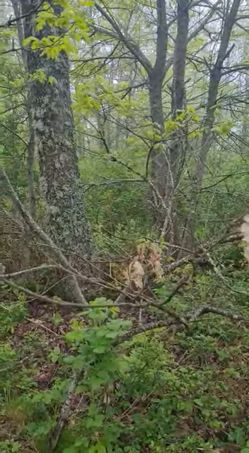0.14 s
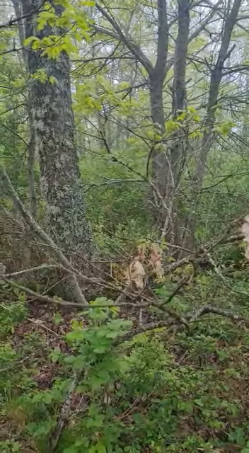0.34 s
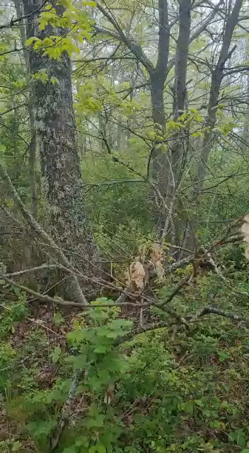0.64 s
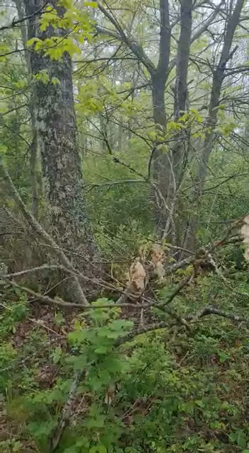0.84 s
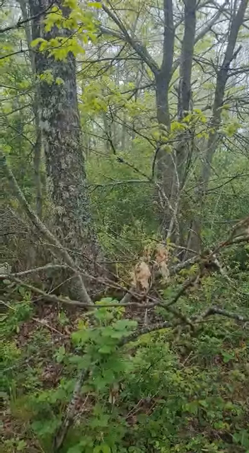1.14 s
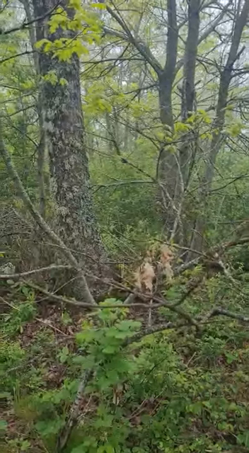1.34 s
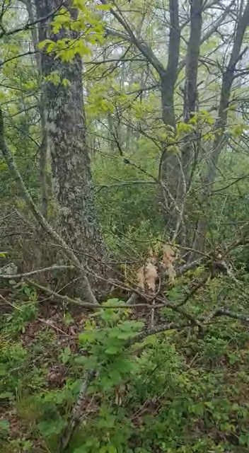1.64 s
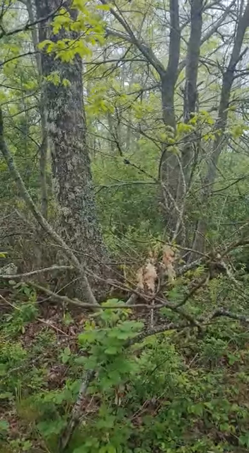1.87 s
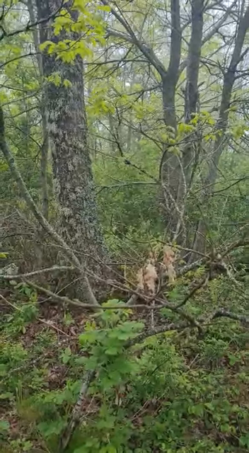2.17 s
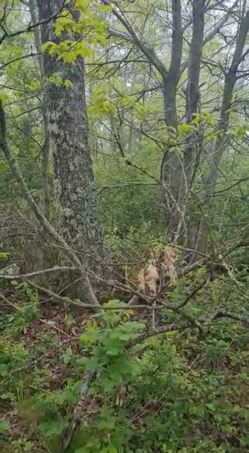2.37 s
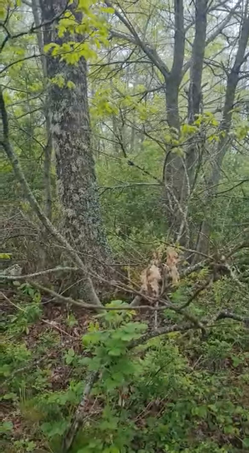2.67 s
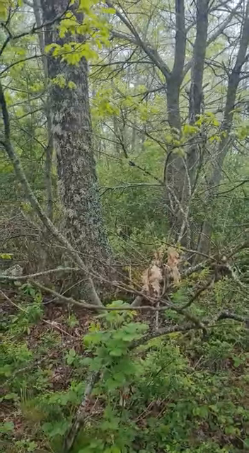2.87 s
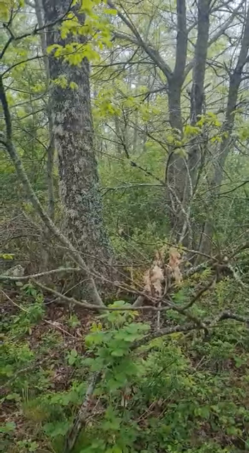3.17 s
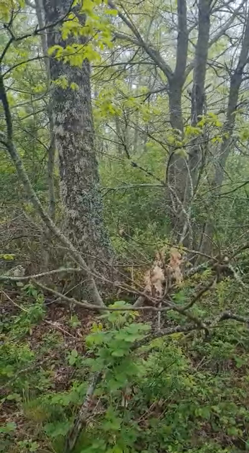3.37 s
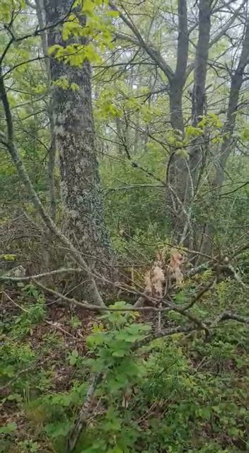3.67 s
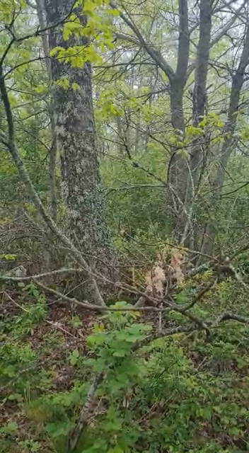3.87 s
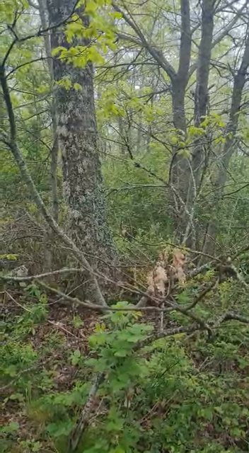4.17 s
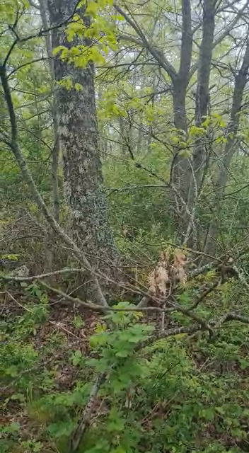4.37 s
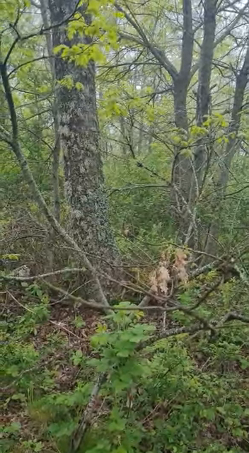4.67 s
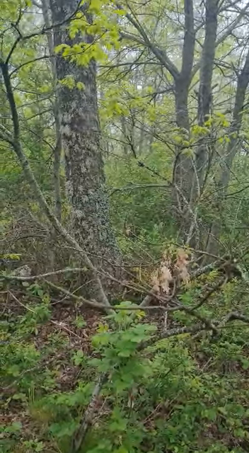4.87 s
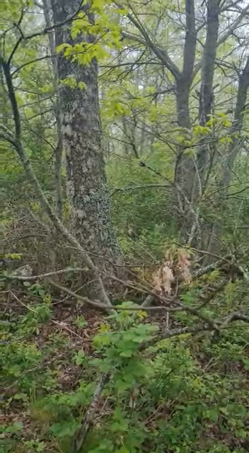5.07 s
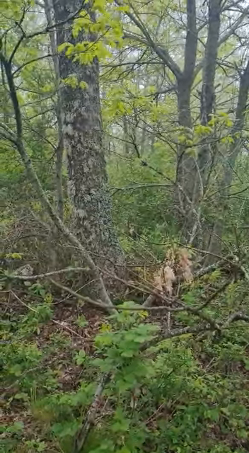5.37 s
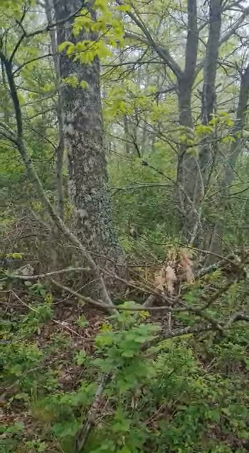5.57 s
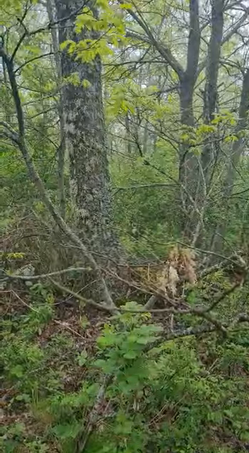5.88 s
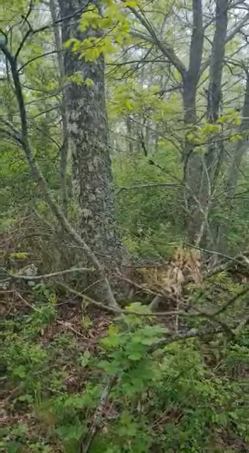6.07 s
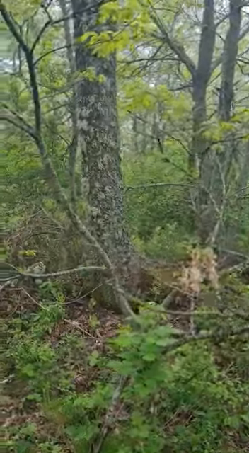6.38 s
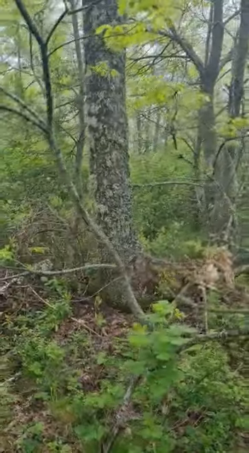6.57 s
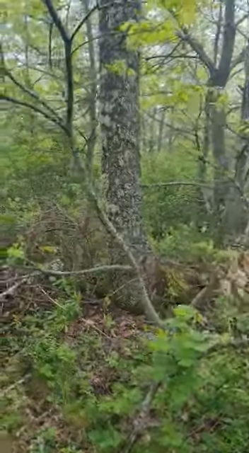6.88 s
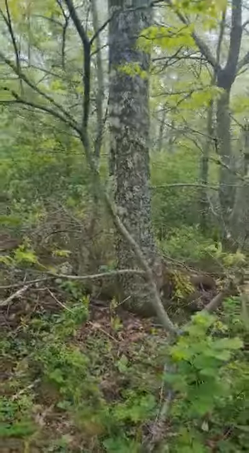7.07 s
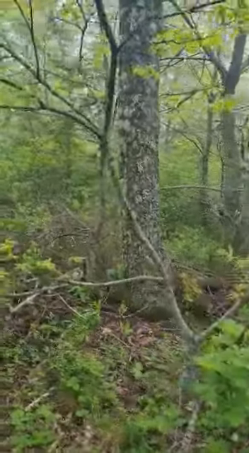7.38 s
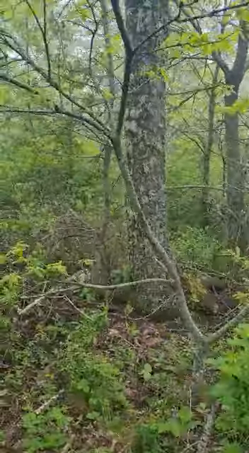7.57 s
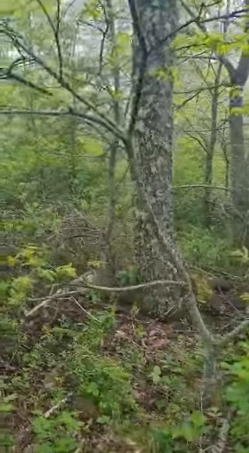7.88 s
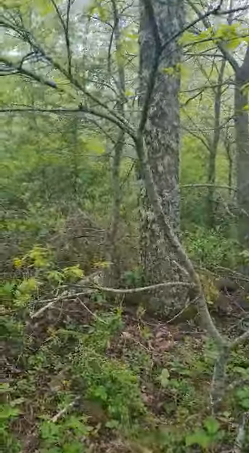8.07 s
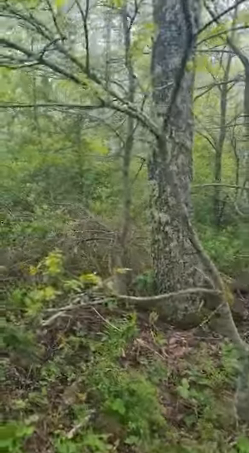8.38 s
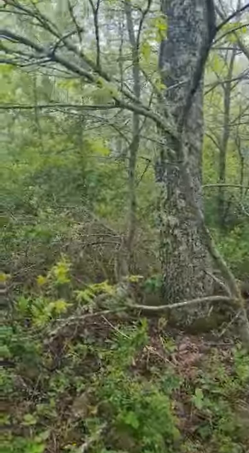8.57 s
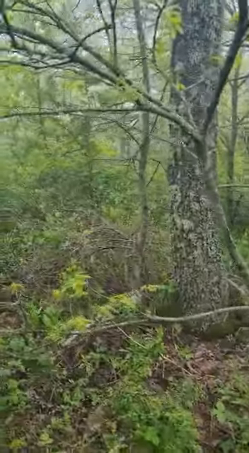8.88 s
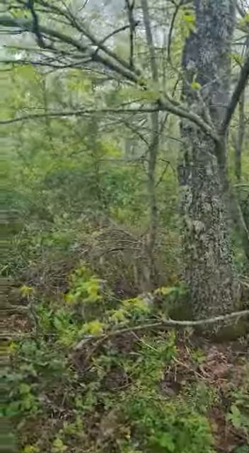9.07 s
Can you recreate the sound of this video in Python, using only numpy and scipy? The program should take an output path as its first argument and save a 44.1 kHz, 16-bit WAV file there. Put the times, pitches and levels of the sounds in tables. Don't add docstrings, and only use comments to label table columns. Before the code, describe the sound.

A quiet wood with soft low hum and thin birdsong. A distant hound barks in a steady run, falls silent while its small bell jingles irregularly, then barks again, louder and higher. Every bark leaves a short woody echo. Whistles and chirps thicken midway; late in the scene leaves stir and heavy wind buffets the handheld stereo microphone, mainly on the right.

```python
import sys
import numpy as np
from scipy import signal
from scipy.fft import rfft, irfft, next_fast_len
from scipy.io import wavfile
from scipy.ndimage import uniform_filter1d

SR = 44100
rng = np.random.default_rng(int(sys.argv[2]) if len(sys.argv) > 2 else 0)


def nominal_scale(level):
    x = np.asarray(level, float) / 20
    return 10 ** x


def put_to_file(sound):
    columns = np.atleast_2d(sound).T
    safe = np.clip(columns, -1, 1)
    whole_steps = np.round(safe * 32767)
    wavfile.write(sys.argv[1], SR, whole_steps.astype(np.int16))


N = 407474


def rms_one(x):
    return x / np.sqrt(np.mean(x ** 2) + 1e-20)


def at_hz(points, hz):
    table_hz, value = np.transpose(points)
    return np.interp(np.log(hz + 1), np.log(table_hz + 1), value)


def drift(rate_hz, size=N):
    r = np.exp(-16 * np.pi * rate_hz / SR)
    white = rng.standard_normal(size // 8 + 1502)
    slow = signal.lfilter([1], [1, -2 * r, r * r], white)[1500:]
    return np.interp(np.arange(size) / 8, np.arange(len(slow)), rms_one(slow))


def coloured(spectrum, white):
    size = next_fast_len(N)
    gain = nominal_scale(at_hz(spectrum, np.fft.rfftfreq(size, 1 / SR)))
    return rms_one(irfft(rfft(white, size) * gain, size)[..., :N])


def butter(x, order, hz, kind="low"):
    return signal.sosfilt(signal.butter(order, hz, kind, fs=SR, output="sos"), x)


def add(track, s, sound):
    i = int(s * SR)
    track[..., i:i + sound.shape[-1]] += sound[..., :N - i]


def add_dome(track, start, top, end, db, power):
    t = start + np.arange(int((end - start) * SR)) / SR
    rise = np.clip((t - start) / (top - start), 0, 1)
    fall = np.clip((end - t) / (end - top), 0, 1)
    add(track, start, nominal_scale(db) * (np.sin(np.pi / 2 * rise) * np.sin(np.pi / 2 * fall)) ** power)


def note(length, hz, db, buzz_hz):
    t = np.arange(int(length * SR)) / SR
    pitch = hz(t) + buzz_hz * drift(380, size=len(t))
    level = nominal_scale(db + 2.3 * drift(40, size=len(t))) * np.sqrt(2) * np.sin(np.pi * t / length) ** 0.26
    return level * np.sin(2 * np.pi * np.cumsum(pitch) / SR)


def throat(x, modes):
    out = 0
    for k, (hz, width_hz, db) in enumerate(modes):
        r = np.exp(-np.pi * width_hz / SR)
        b = (1 - r * r) / 2 * np.array([1, 0, -1])
        a = [1, -2 * r * np.cos(2 * np.pi * hz / SR), r * r]
        ring = signal.lfilter(b, a, signal.lfilter(b, a, x))
        out = out + nominal_scale(db + 2.4 * drift(14, size=len(x))) * (-1) ** k * ring
    return out / np.sqrt(uniform_filter1d(out ** 2, size=900) + 1e-12)


# (time [s], length [s], chest level [dB], top pitch [Hz], jaw opening re chest [dB])
BARKS = [(0.783, 0.16, -42, 518.5, 4.5), (1.243, 0.15, -43, 526.9, 3.5), (1.797, 0.15, -42, 519.8, 1),
         (2.281, 0.17, -41.5, 540, 2), (2.769, 0.15, -40, 517.2, 1), (6.428, 0.15, -37, 592.5, 0),
         (6.82, .17, -35, 673.6, -2.5), (7.193, .164, -36.5, 636.3, -5.5), (7.67, 0.14, -41, 560, -0.5),
         (8.109, 0.16, -41, 579.3, 3), (8.812, 0.15, -40.5, 567.5, 0)]
BARK_CLEAR_DB = [-1.6, 3.6, -1.2, -1.5, -3.5, 0, -1, -2.3, 0, -9, -3]
# (time [s], length [s], start [Hz], end [Hz], level [dB])
SECOND_VOICE = [(0.824, 0.06, 625, 628, -53.5), (2.301, 0.1, 622.6, 621, -48),
                (2.771, 0.1, 650, 613, -47.5), (6.433, 0.042, 720, 575, -41.5),
                (6.839, 0.062, 400, 527, -44), (7.219, 0.049, 400, 507, -48), (.812, 0.056, 806, 895, -55),
                (7.7, 0.047, 1010, 987, -37.5), (8.146, 0.024, 1103, 1066, -46),
                (6.47, 0.034, 980, 1053, -37), (8.84, 0.09, 860, 768, -55)]
# (centre [Hz], width [Hz], level [dB])
CHEST = [(558.5, 212, 19), (650, 310, 4)]
# (centre [Hz], width [Hz], level [dB])
MOUTH = [(979, 262, 6.5), (1200, 490, -6.5)]
# (centre [Hz], width [Hz], level [dB])
EDGE = [(1302, 366, 4.5), (1734, 310, -4.5), (1890, 530, -6), (2485, 340, -9.5), (2780, 220, -15.5)]
# (frequency [Hz], level per Hz [dB])
BREATH = [(1710, -28), (2900, -2), (3090, -14.5), (3440, -6), (4480, -11.5), (6620, -8), (10300, -20),
          (15900, -36.5)]
LOUDEST_SHARE = 0.49
EDGE_DB, EDGE_FOLLOWS = -3, 0.82
FOLD_FOLLOWS = -0.41
PITCH_TOP_SHARE, PITCH_SAG, PITCH_POINT, TIGHT_EARLY = .54, .75, 1.4, .03
PLUNGE, PLUNGE_POINT, SLACK_HZ = 8, 5.0, 130
SLACK_DB, SLACK_BEFORE_S, SLACK_AFTER_S = -22, .004, .02
OVERTONE_DB = -18
FOLD_SCATTER = 0.57


def hound():
    t = np.arange(N) / SR
    fold, slack, chest, mouth, edge = np.zeros((5, N))
    arch = np.full(N, float(SLACK_HZ))
    for (start, length, chest_db, top_hz, mouth_db), clear_db in zip(BARKS, BARK_CLEAR_DB):
        top, end = start + LOUDEST_SHARE * length, start + length
        edge_db = EDGE_DB + EDGE_FOLLOWS * mouth_db
        fold_db = chest_db + clear_db - 0.5 + FOLD_FOLLOWS * mouth_db
        away = np.abs((t - start) / length - PITCH_TOP_SHARE - TIGHT_EARLY * min(mouth_db, 0))
        bend = PITCH_SAG * away ** PITCH_POINT + PLUNGE * away ** PLUNGE_POINT
        arch = np.maximum(arch, top_hz * (1 - bend))
        add_dome(slack, start - SLACK_BEFORE_S, top, end + SLACK_AFTER_S, chest_db + SLACK_DB, power=.4)
        add_dome(fold, start - .004, top + 0.006, end + 0.023, fold_db, power=3.63)
        add_dome(chest, start, top - .01, end, chest_db - 8.5, power=0.78)
        add_dome(mouth, start + 0.0094, top - .01, end + 0.0068, chest_db + mouth_db, power=1.51)
        add_dome(edge, start + 0.011, top - .03, end + 0.0066, chest_db + edge_db, power=1.42)
    phase = 2 * np.pi * np.cumsum(arch * (1 + 0.01532 * drift(60.2))) / SR
    pulses = sum(np.cos(k * phase) for k in range(1, 8))
    pulses = pulses * nominal_scale(2.95 * drift(92)) * (1 + 0.5 * np.cos(phase / 2))
    air = rng.standard_normal(N) * (2.0 + np.cos(phase))
    half = nominal_scale(-24.0 + 6.0 * drift(30)) * np.sqrt(fold * nominal_scale(-35.0)) * np.where(t > 6, .9, .4)
    partials = np.cos(phase) + nominal_scale(OVERTONE_DB + 4 * drift(25)) * np.cos(2 * phase)
    clear = (fold + slack * nominal_scale(5 * drift(65))) * nominal_scale(4.0 * drift(35)) * partials
    husk = half * np.cos(phase / 2)
    for effort, air_share, modes in [(chest, 3.1, CHEST), (mouth, 2.8, MOUTH), (edge, 2.5, EDGE)]:
        husk = husk + effort * throat(pulses + air_share * air, modes)
    for s, length, hz0, hz1, db in SECOND_VOICE:
        add(clear, s, note(length, lambda t: hz0 + (hz1 - hz0) * t / length, db, buzz_hz=26.6))
    airflow = signal.lfilter([.001], [1, -.999], mouth + edge + 1e-9) ** 0.69
    breath = nominal_scale(-37.5) * airflow * coloured(BREATH, rng.standard_normal((2, N)))
    scattered = husk + FOLD_SCATTER * clear * drift(60)
    return husk + clear, scattered, breath


def earlier():
    out = np.zeros(N)
    decay_db = -75 - 60 * np.arange(SR) / SR / 0.69
    add(out, 0, nominal_scale(decay_db) * throat(rng.standard_normal(SR), MOUTH + CHEST[:1]))
    return out


# (delay [s], level [dB])
ECHOES = [
    (.155, -26.5),
    (.245, -28.5),
]
LAG_S = 5e-5


def direct_and_slap_backs(voice, scattered):
    t = np.arange(N) / SR
    direct = np.array([voice * nominal_scale(1.4), np.interp(t - 2 * LAG_S, t, voice) * nominal_scale(2.5)])
    for lag, db in ECHOES:
        add(direct, lag, nominal_scale(db) * signal.lfilter([.3], [1, -.7], scattered))
    return direct


# (frequency [Hz], T60 [s])
ECHO_T60 = [(200, 0.084), (500, 0.95), (1000, 0.94), (3000, 0.61), (12000, 0.34)]


def trunks(x, alike):
    t = np.arange(SR) / SR
    tail = 0
    for low_hz in 125 * 2. ** np.arange(7):
        band = butter(rng.standard_normal((3, SR)), 2, [low_hz, min(2 * low_hz, 16000)], "band")
        decay = nominal_scale(-60 * t / at_hz(ECHO_T60, 1.5 * low_hz))
        tail = tail + (alike * band[0] + band[1:]) * decay
    tail = tail * np.minimum(t / 0.0087, 1)
    return signal.fftconvolve(x[None], tail / np.sqrt(np.sum(tail ** 2) / 2), axes=1)[:, :N]


# (time [s], peak level [dB], lowest mode re peak [dB])
JINGLES = [(.08, -82.5, 6.5), (.259, -59.5, -3.5), (.44, -64, -5.5), (2.4413, -68.5, 6),
           (2.5586, -49.5, -17), (3.1014, -53.5, -11.5), (3.3064, -63, -3), (3.3894, -66, -6),
           (3.4974, -61, -7), (3.6212, -63.5, -10.5), (3.8262, -61.5, -10), (4.189, -56, -13),
           (4.2994, -65.5, -8), (4.4837, -50, -10), (4.6872, -53.5, -6.5), (4.791, -49.5, -6),
           (4.9392, -57, -7.5), (5.004, -55.5, -4), (5.7319, -57.5, -10), (6.0102, -43.5, -9),
           (6.1165, -41, -17), (6.4672, -36.5, -20.5), (6.8114, -40, -14), (7.0219, -53.5, -8.5),
           (7.3073, -59, -7), (7.3726, -54.5, -5.5), (7.9613, -60.5, -9), (8.4642, -53.5, -9.5),
           (8.6517, -56, -7), (9.0229, -54.5, -7.5)]
# (time [s], peak level [dB])
TINKLES = [(0.347, -64.5), (.69, -74), (1.077, -59.5), (2.0704, -67.5), (3.8837, -59), (3.982, -51.5),
           (4.106, -55.5), (4.56, -55), (5.0519, -56), (5.119, -63), (5.1853, -45), (5.457, -55.5),
           (5.52, -53.5), (5.5693, -59.5), (5.803, -41.5), (6.393, -54), (6.67, -51), (7.2013, -55.5),
           (7.5866, -76), (7.676, -52.5), (8.2557, -53.5), (8.774, -55)]
TINKLE_LOW_DB = -25
# (frequency [Hz], flutter [Hz], level [dB])
BELL = [(2222, 75, 1.5), (4720, 89, -18.5), (5350, 50, -16.5), (6600, 60, -23), (7430, 200, -22),
        (8795, 50, -15.5), (9330, 120, -15), (11174, 93, -19), (12200, 113, -15), (13650, 90, -26.5),
        (14200, 67, -8.5), (14350, 90, -12.5), (14500, 65, -22), (15200, 110, -25.5)]
# (time [s], length [s], level [dB])
FREE_RINGS = [
    (3.825, 0.14, -72.5),
    (3.99, 0.28, -79.5),
    (6.665, 0.091, -68),
    (6.83, 0.095, -71),
    (7.02, 0.081, -72),
    (8.719, 0.05, -83),
]


def bell():
    out, clack = np.zeros((2, N)), np.zeros(N)
    t = np.arange(int(.25 * SR)) / SR
    shape = np.exp(-t / .06) / (1 + np.exp((t - .078) / .008)) * np.minimum(t / .007, 1)
    strikes = JINGLES + [(s, db, TINKLE_LOW_DB) for s, db in TINKLES]
    chance_db = 4.5 * np.clip(rng.standard_normal((len(strikes), len(BELL))), -3, 1)
    for k, (hz, width_hz, db) in enumerate(BELL):
        level = np.zeros(N)
        for (s, peak_db, low_db), draw_db in zip(strikes, chance_db[:, k]):
            mode_db = low_db + 1.5 if k == 0 else db - 3.5 + draw_db
            add(level, s - .004, nominal_scale(peak_db + mode_db) * shape)
        phase = 2 * np.pi * hz * np.arange(N) / SR
        for side in out:
            wander = min(hz / 5000, 1.3) * drift(.5 * width_hz)
            side += level * nominal_scale(5.25 * drift(1.0 * width_hz)) * np.sin(phase + wander)
    for s, peak_db, _ in strikes:
        add(clack, s - .004, nominal_scale(peak_db - 26) * shape * np.exp(-t / .04))
    for s, length, db in FREE_RINGS:
        add(out, s, note(length, lambda t: BELL[1][0] + 0 * t, db, buzz_hz=15))
    return out + clack * np.diff(rng.standard_normal((2, N + 1)))


# (time [s], first level [dB], last level [dB])
TRILLS = [
    (.403, -68, -61),
    (4.452, -70.5, -62.5),
]
TRILL_STEPS = [
    (7, 8),
    (6, 7),
]
TRILL_STEP_S, TRILL_SLOWS_S = .0496, .0046
TRILL_PULSE_HZ, TRILL_PULSE_DEPTH = 130, .4


def trills(out):
    for (start, first_db, last_db), (even, slowing) in zip(TRILLS, TRILL_STEPS):
        steps = TRILL_STEP_S + TRILL_SLOWS_S * np.maximum(np.arange(even + slowing) - even + 1, 0)
        starts = start + np.append(0, np.cumsum(steps))
        for k, (s, step) in enumerate(zip(starts, np.diff(starts, append=starts[-1] + .1))):
            share, length = k / len(starts), .72 * step
            t = np.arange(int(length * SR)) / SR
            pulsing = 1 + TRILL_PULSE_DEPTH * np.sin(2 * np.pi * TRILL_PULSE_HZ * t)
            note_db = first_db + (last_db - first_db) * share
            voices = [(3400, 3750 + 450 * share, 0.5), (3920, 4500 + 650 * share, -6 + 7 * share),
                      (4950, 6200, -11.5), (5730, 7600, -15.5)]
            for low_hz, high_hz, db in voices:
                add(out, s, pulsing * note(
                    length, lambda t: high_hz + (low_hz - high_hz) * np.exp(-2.5 * t / length),
                    note_db + db, buzz_hz=.035 * high_hz))


# (time [s], end pitch [Hz], length [s], level [dB], fall time [s])
CHIPS = [(0.517, 4030, 0.042, -65, 0.0079), (1.552, 3870, 0.057, -69, 0.0081),
         (1.9, 4854, 0.059, -64, 0.013), (2.257, 4690, 0.076, -67.5, 0.017),
         (2.627, 3880, 0.033, -65, 0.0094), (2.978, 3920, 0.034, -68, 0.0056),
         (3.361, 4720, 0.049, -64.5, 0.014), (3.744, 3670, 0.066, -69, 0.011),
         (4.114, 3590, 0.045, -63.5, 0.0075), (4.466, 4360, 0.077, -61, 0.012),
         (8.204, 4044, 0.06, -66.5, 0.013), (8.57, 4020, 0.064, -70.5, 0.011),
         (8.686, 5350, 0.054, -75, 0.0076), (8.933, 4060, 0.063, -63.5, 0.0081)]


def chips(out):
    for s, end_hz, length, db, fall_s in CHIPS:
        chip = note(length, lambda t: end_hz + 3300 * np.exp(-t / fall_s) - 1500 * t, db, buzz_hz=40.2)
        add(out, s, chip * np.linspace(.8, .9, len(chip)))


# (time [s], length [s], pitch [Hz], level [dB])
HELD = [(0.619, 0.032, 7370, -71), (5.029, 0.043, 3520, -64), (5.115, 0.1, 3484, -60),
        (5.642, 0.17, 3670, -71.5), (5.962, 0.081, 2904, -70.5), (6.541, 0.067, 3990, -64.5),
        (6.584, 0.039, 2938, -68.5), (6.687, 0.1, 3490, -62), (6.732, 0.074, 3127, -56.5),
        (7.276, 0.053, 3192, -55.5), (7.285, 0.099, 3590, -62), (7.465, 0.11, 3964, -68.5),
        (7.681, 0.11, 3400, -59.5), (8.4, 0.13, 3450, -69.5)]
# (time [s], length [s], start [Hz], end [Hz], level [dB])
SLURS = [(5.163, 0.04, 3510, 4150, -61), (5.234, 0.056, 3450, 4030, -65.5), (3.358, 0.14, 2220, 2070, -77),
         (5.454, 0.04, 2795, 2975, -69), (5.634, 0.066, 5110, 4680, -69.5), (5.67, 0.09, 4730, 5700, -65.5),
         (6.134, 0.13, 3154, 2830, -69), (6.28, 0.078, 3115, 2770, -59.5), (6.718, 0.028, 2700, 3240, -63),
         (6.773, 0.045, 3170, 2240, -66), (7.063, 0.053, 4440, 4430, -58),
         (7.144, 0.067, 4010, 4290, -56.5), (7.64, 0.067, 4054, 3400, -67.5),
         (8.004, 0.11, 2780, 3090, -67.5), (8.145, 0.086, 3747, 3400, -57.5),
         (8.354, 0.064, 3840, 3420, -61), (8.488, 0.042, 2680, 2764, -61.5),
         (8.604, 0.052, 3104, 2780, -66), (6.263, 0.031, 3925, 3370, -58),
         (7.006, 0.032, 4420, 4030, -59.5), (7.037, 0.069, 4187, 3350, -55.5),
         (7.221, 0.023, 5500, 3330, -58), (7.089, 0.068, 3343, 3480, -57.5)]
# (time [s], length [s], start [Hz], end [Hz], level [dB])
BUZZES = [
    (.37, 0.034, 5690, 4500, -73),
    (5.103, 0.17, 3040, 2820, -83.5),
    (5.218, 0.061, 3100, 2780, -70),
    (5.793, 0.091, 4280, 3920, -64.5),
    (5.967, 0.2, 7820, 7380, -59),
    (6.368, 0.182, 3300, 3463, -64),
    (6.6, 0.12, 3930, 3940, -71),
]
# (time [s], level [dB], middle pitch [Hz])
CHUCKS = [
    (5.312, -77, 3600),
    (5.342, -58.5, 3520),
    (5.44, -60, 3430),
    (5.549, -59.5, 3565),
    (6.239, -63, 3870),
    (2.714, -77, 4167),
    (4.2, -97, 3610),
]
HELD_BUZZ_HZ, SLUR_BUZZ_HZ, BUZZ_SHARE = 45, 75, 0.05
CHUCK_S, CHUCK_SWING_HZ, CHUCK_TURNS = 0.026, 650, 1.7


def whistles(out):
    for s, db, hz in CHUCKS:
        def swing(t):
            return hz + CHUCK_SWING_HZ * np.cos(2 * np.pi * CHUCK_TURNS * t / CHUCK_S)
        add(out, s, note(CHUCK_S, swing, db, buzz_hz=130))
    calls = [(s, length, hz, hz, db, HELD_BUZZ_HZ) for s, length, hz, db in HELD]
    calls += [(*row, SLUR_BUZZ_HZ) for row in SLURS]
    calls += [(*row, BUZZ_SHARE * row[2]) for row in BUZZES]
    for s, length, hz0, hz1, db, buzz_hz in calls:
        add(out, s, note(length, lambda t: hz1 + (hz0 - hz1) * (1 - t / length) ** 1.844, db, buzz_hz))


def birds():
    out = np.zeros(N)
    trills(out)
    chips(out)
    whistles(out)
    return out


# (time [s], level [dB], left minus right [dB])
PUFFS = [(4.923, -52.5, 19), (4.99, -44, -28), (5.059, -43.5, -29), (5.139, -46.5, -8), (5.264, -45, -27),
         (5.351, -54.5, 4), (5.43, -74, 25), (5.578, -60, -15), (7.03, -61, 14), (7.15, -56.5, -25),
         (7.3, -58, -5), (7.382, -56.5, -5.5), (7.5, -63, -7), (8.04, -61, -2), (8.13, -42, -1),
         (8.245, -27, -12.5), (8.3, -32, -9), (8.337, -24, -22), (8.39, -37, -2.5), (8.442, -29.5, -12),
         (8.521, -20.5, -17), (8.588, -37, -21), (8.651, -38.5, -1), (8.771, -43, 15.5), (8.93, -44, 7),
         (8.999, -43.5, 11), (9.127, -40.5, 2.5), (9.17, -45.5, 8)]
PUFF_RISE_DB_S, PUFF_FALL_DB_S = 310, 220


def puffs():
    t = np.arange(0, N, 32) / SR
    s, db, pan_db = np.transpose(PUFFS)
    late = t - s[:, None]
    slope_db = np.where(late < 0, PUFF_RISE_DB_S * late, -PUFF_FALL_DB_S * late)
    power = np.sum(nominal_scale(db[:, None] + slope_db) ** 2, axis=0)
    full = np.arange(N) / SR
    return np.interp(full, t, 10 * np.log10(power + 1e-14)), np.interp(full, s, pan_db)


# (time [s], level [dB], pitch [Hz])
SLAPS = [(5.261, -60.5, 224), (7.046, -56.5, 109), (7.12, -56, 111), (7.385, -46, 151), (7.84, -51, 150),
         (8.1, -43, 160), (8.25, -20.5, 222.6), (8.45, -31, 150), (8.741, -40, 121), (8.78, -42, 120),
         (8.911, -45, 130), (8.233, -20, 229.4), (8.332, -15.5, 197), (8.52, -31, 229.8),
         (8.53, -13.5, 276), (8.579, -13.5, 290), (8.644, -21.5, 115), (8.979, -33.5, 126),
         (9.041, -35, 167.1), (9.116, -25, 128), (9.132, -31.5, 141)]


def slaps():
    out, t = np.zeros(N), np.arange(1500) / SR
    for s, db, hz in SLAPS:
        swell = hz * t / 0.43 * np.exp(-hz * t / 0.45)
        add(out, s - .002, nominal_scale(db) * np.sin(2 * np.pi * hz * t) * swell)
    return butter(out, 3, 700)


# (frequency [Hz], level per Hz [dB])
WIND = [(12, -72), (20, -14.5), (59, 7), (120, -0.5), (306, -11.5), (431, -23), (619, -30.5), (1010, -48.5),
        (1500, -59), (1950, -56), (3300, -120)]


def wind():
    level_db, pan_db = puffs()
    eddies = butter(coloured(WIND, rng.standard_normal((2, N))), 2, 48, "high")
    dull = rms_one(butter(eddies, 3, 95))
    bright = np.clip((level_db + 47.0) / 13, .08, 1)
    eddies = bright * eddies + (1 - bright) * dull
    eddies = eddies / np.sqrt(uniform_filter1d(eddies ** 2, size=3000) + .02)
    eddies = eddies * nominal_scale(2.5 * np.array([drift(14), drift(14)]))
    pan = nominal_scale(np.clip(pan_db, -16, 16) * np.array([[.5], [-.5]]))
    pan = pan / np.sqrt(np.mean(pan ** 2, axis=0))
    return (nominal_scale(level_db + 5.0) * eddies + 2.0 * slaps()) * pan


# (time [s], level [dB])
RUSTLE = [
    (0, -100),
    (5.9, -95),
    (6.5, -90.5),
    (7.1, -71),
    (7.751, -67),
    (8.2, -73.5),
    (8.8, -66.5),
    (9.24, -72),
]


def rustle():
    level_db = np.interp(np.arange(N) / SR, *np.transpose(RUSTLE))
    hiss = butter(rng.standard_normal((2, N)), 2, 6500, "high")
    return nominal_scale(level_db + 4.5 * drift(10)) * hiss


# (frequency [Hz], level per Hz [dB])
WOODS = [(13, -53), (22, -1), (70, 5.5), (190, -8), (400, -11.5), (1000, -22), (1600, -24), (2300, -23.5),
         (4500, -21.5), (7000, -25.5), (15900, -29.5)]
# (frequency [Hz], likeness [0-1])
LIKENESS = [(60, 0.81), (180, 0.86), (550, 0.63), (1650, 0.087), (4970, 0.13), (15000, 0.042)]
WOODS_DB = -72


def woods():
    size = next_fast_len(N)
    alike = np.clip(at_hz(LIKENESS, np.fft.rfftfreq(size, 1 / SR)), 0, 1)
    sway = nominal_scale(1.5 * drift(3))
    mid, side = rfft(rng.standard_normal((2, size)))
    pair = np.sqrt(1 + alike) * mid + np.sqrt(1 - alike) * side * np.array([[1], [-1]])
    pair = irfft(pair, size)[:, :N]
    return nominal_scale(WOODS_DB) * sway * coloured(WOODS, pair) * nominal_scale([[-1.2], [1.2]])


def scene():
    voice, scattered, breath = hound()
    barks = direct_and_slap_backs(voice, scattered) + breath + earlier()
    barks = barks + nominal_scale(-10.0) * trunks(scattered, alike=1.4)
    jingle = bell()
    collar = jingle * nominal_scale([[-1.5], [1.5]]) + nominal_scale(-10.5) * trunks(jingle[0], alike=0.18)
    song = birds()
    singers = np.array([song, np.roll(song, 2)]) + nominal_scale(-6) * trunks(song * drift(90), alike=.3)
    return barks + collar + singers + wind() + rustle() + woods()


def low_pass(x):
    return signal.sosfilt(signal.butter(12, 15830, fs=SR, output="sos"), x)


OVERLOAD = .55


def record(dry):
    return low_pass(OVERLOAD * np.tanh(dry / OVERLOAD))


dry = scene()
out = record(dry)
put_to_file(out)
```